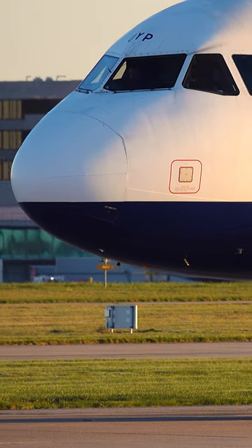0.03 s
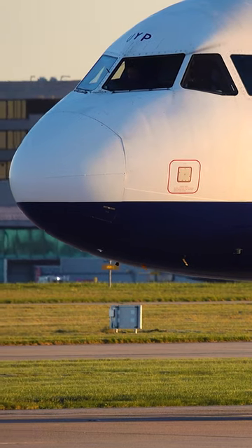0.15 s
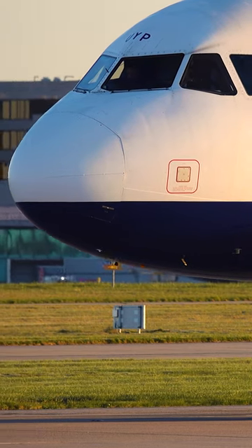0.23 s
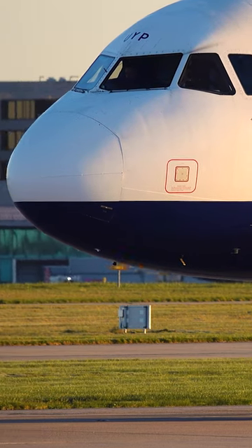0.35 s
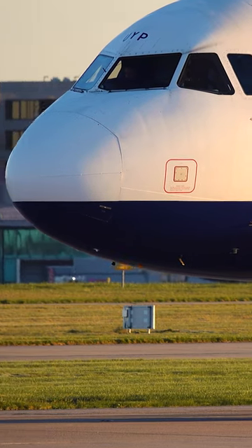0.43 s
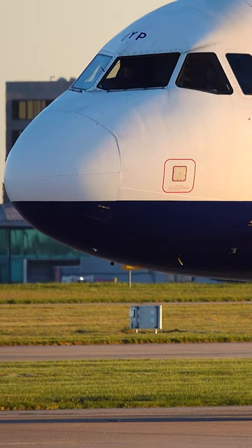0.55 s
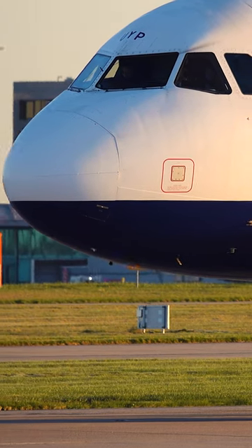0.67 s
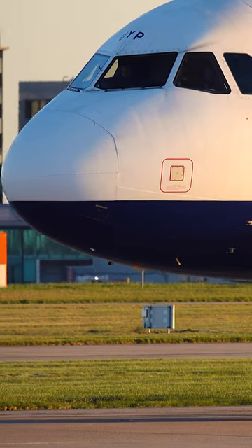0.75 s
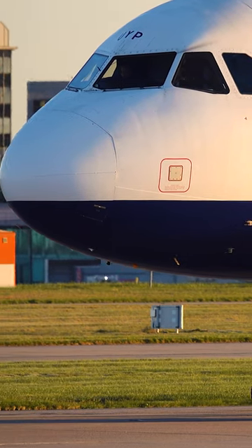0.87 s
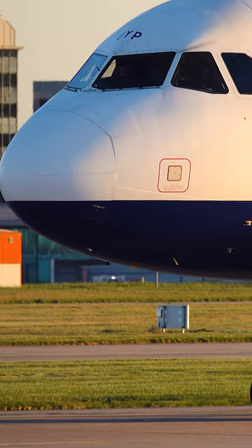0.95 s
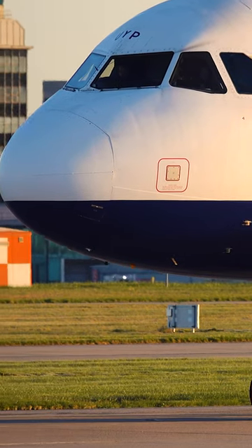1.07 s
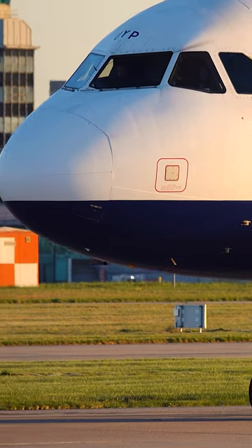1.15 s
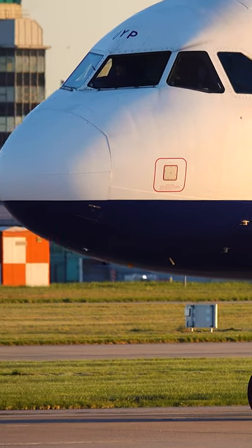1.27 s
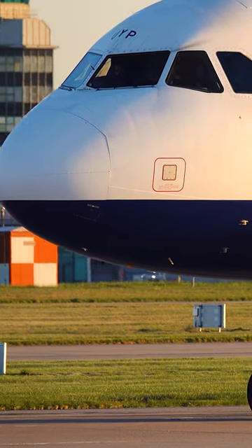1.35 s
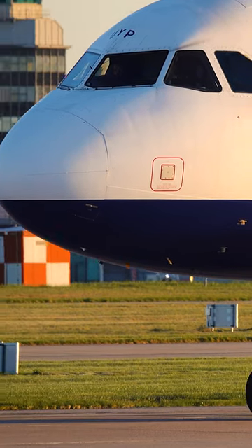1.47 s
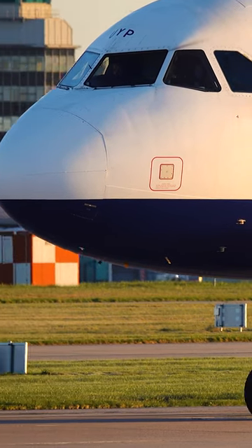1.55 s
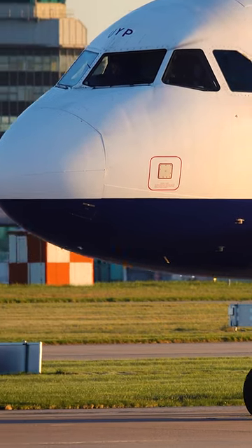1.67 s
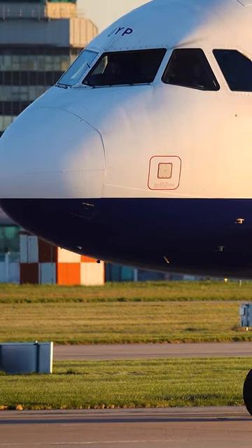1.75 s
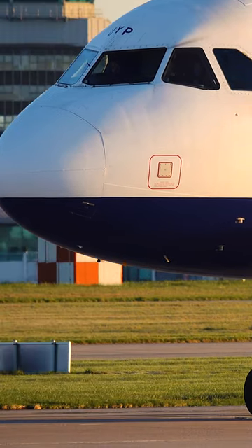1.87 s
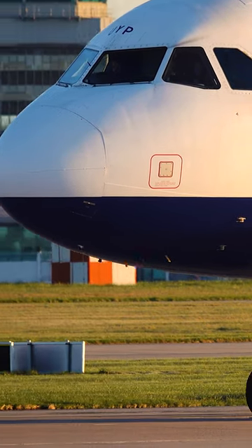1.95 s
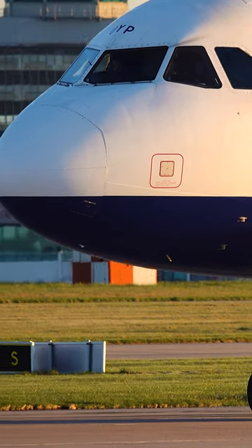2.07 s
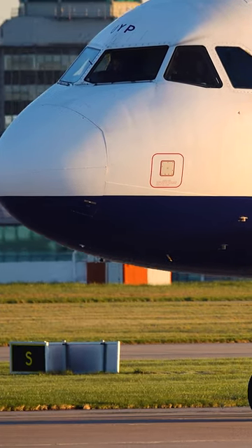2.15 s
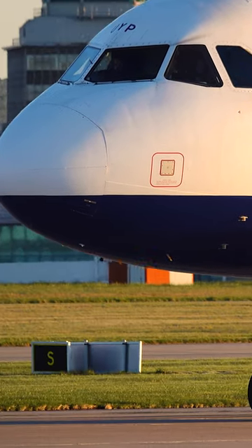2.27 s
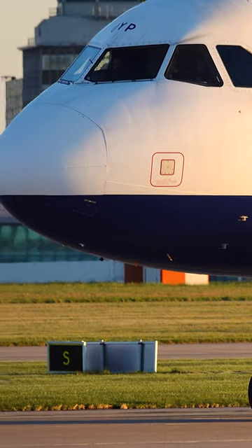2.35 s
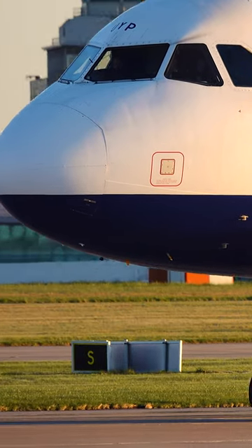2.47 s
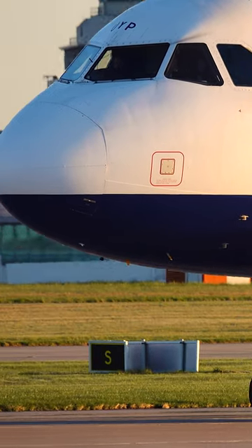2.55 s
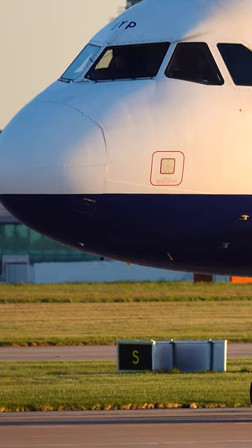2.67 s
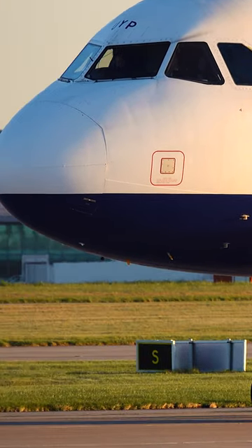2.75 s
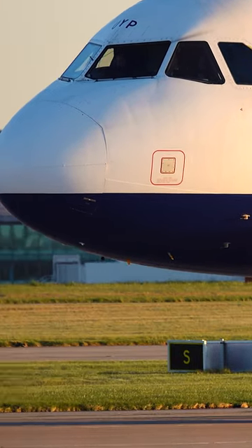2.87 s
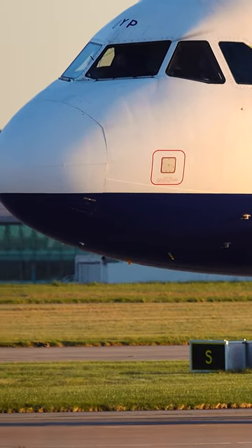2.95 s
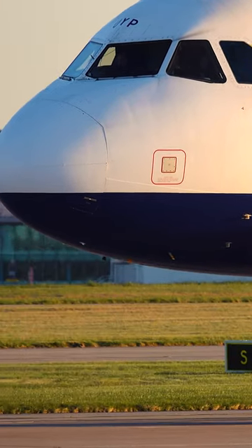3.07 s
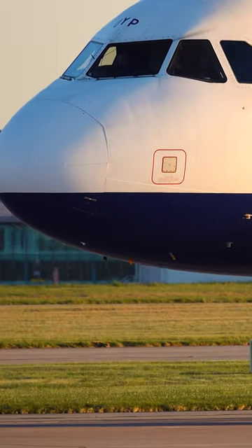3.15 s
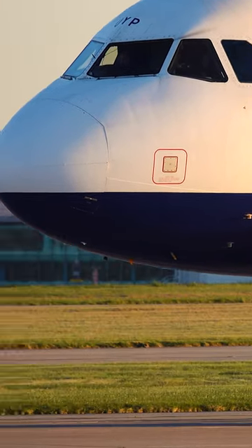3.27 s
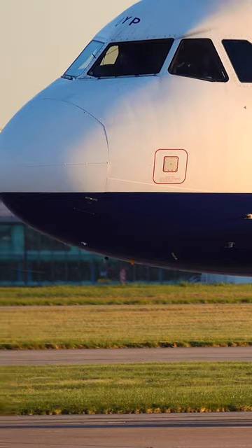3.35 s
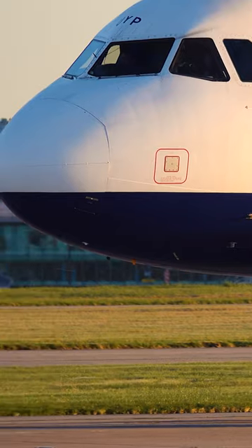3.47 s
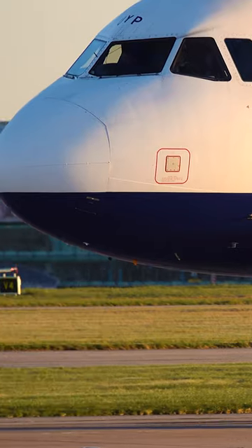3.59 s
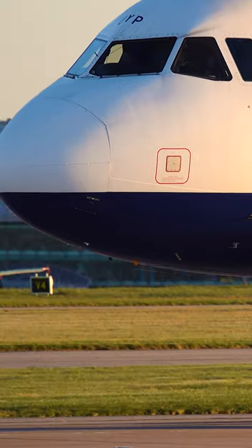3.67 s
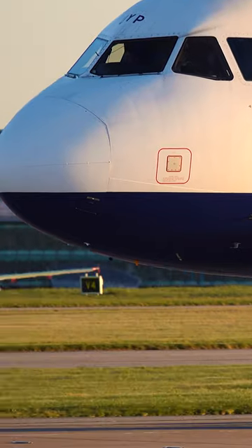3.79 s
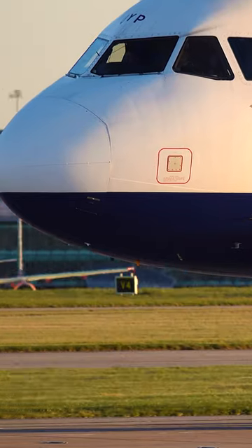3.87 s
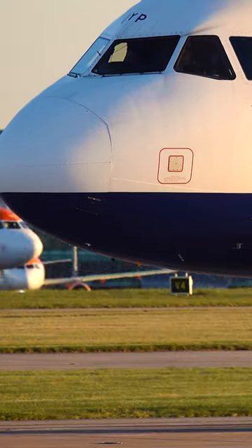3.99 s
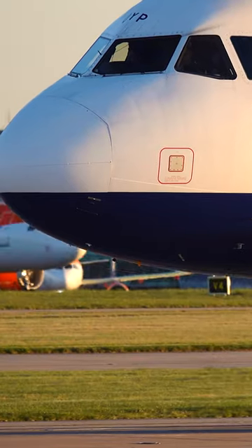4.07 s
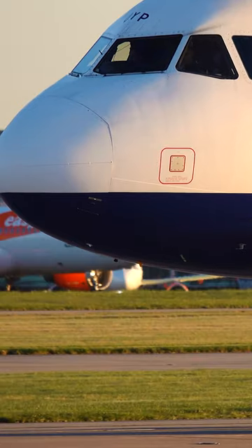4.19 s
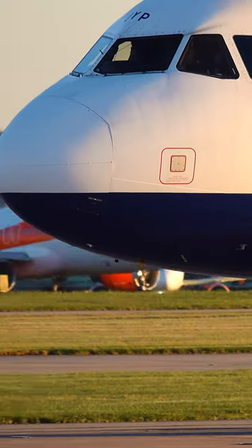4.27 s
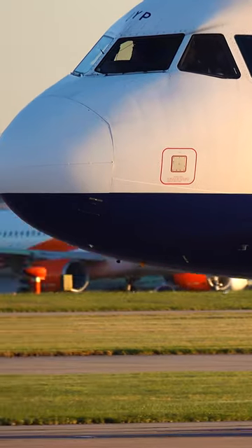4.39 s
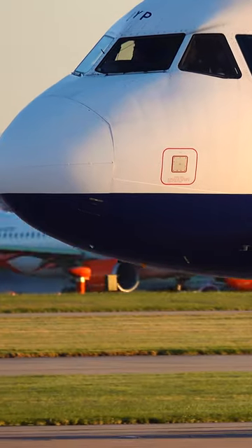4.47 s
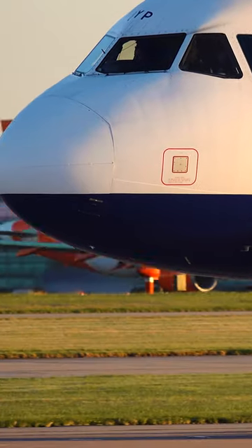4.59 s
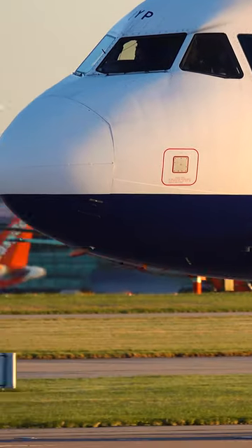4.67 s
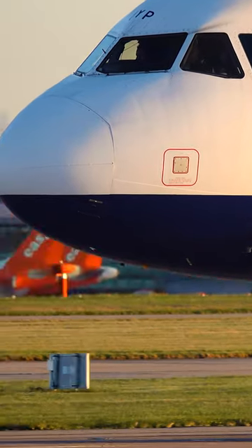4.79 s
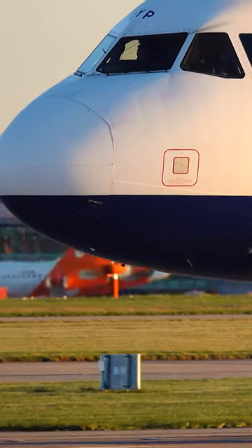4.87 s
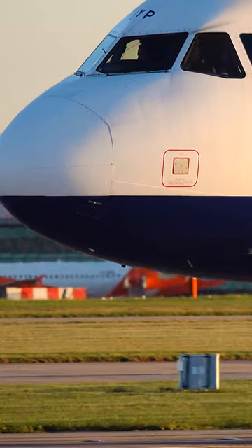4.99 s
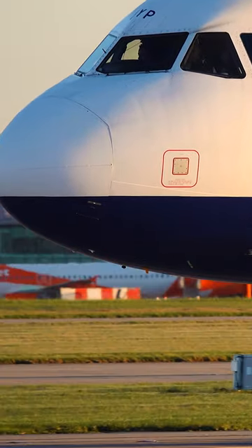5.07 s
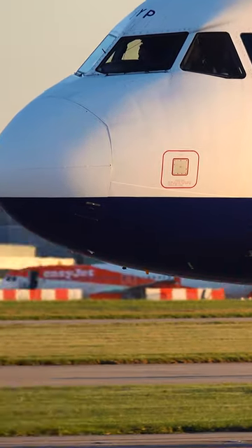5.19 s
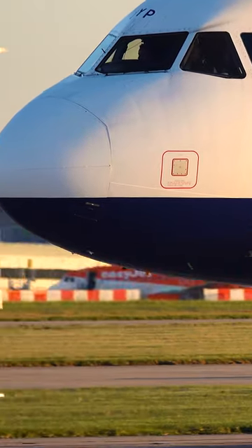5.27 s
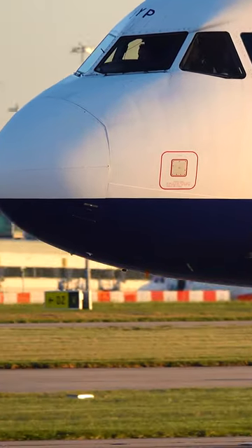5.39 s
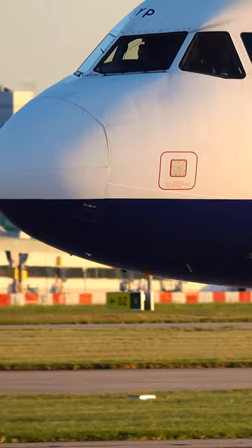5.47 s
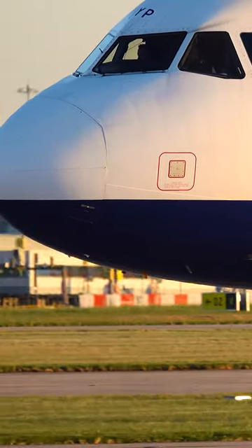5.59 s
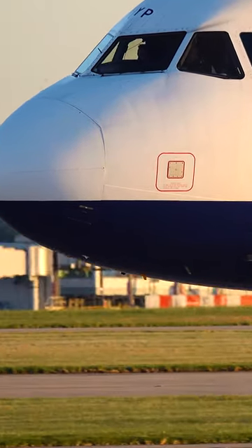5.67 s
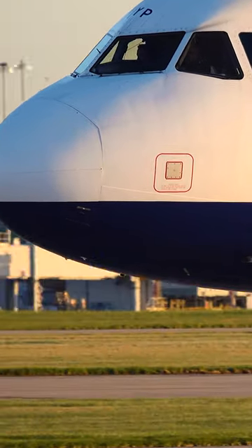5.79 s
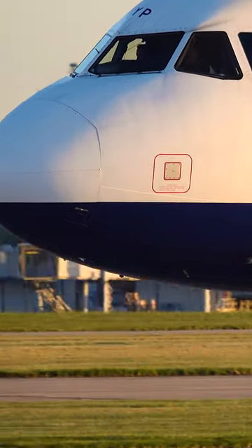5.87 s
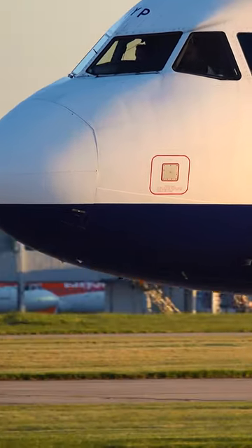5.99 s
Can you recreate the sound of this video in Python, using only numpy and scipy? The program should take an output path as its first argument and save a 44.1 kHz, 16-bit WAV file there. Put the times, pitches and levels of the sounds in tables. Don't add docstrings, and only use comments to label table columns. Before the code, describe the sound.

An airliner's two turbofans rise in pitch and strength near a runway, whistling and hissing, before a harsh sawing buzz joins the roar.

```python
import sys
import numpy as np
from scipy import signal
from scipy.fft import rfft, irfft, next_fast_len
from scipy.io import wavfile
from scipy.ndimage import uniform_filter1d

SR = 44100
rng = np.random.default_rng(int(sys.argv[2]) if len(sys.argv) > 2 else 0)


def gain_from_db(level_db):
    decades = np.asarray(level_db, float) / 20
    return 10 ** decades


def dump(signal):
    limited = np.clip(np.atleast_2d(signal).T, -1, 1)
    pcm = np.round(limited * 32767).astype(np.int16)
    wavfile.write(sys.argv[1], SR, pcm)


N = 266364
BLADES = 22


def rms_one(x):
    return x / np.sqrt(np.mean(x ** 2) + 1e-20)


def in_time(rows):
    s, *columns = np.transpose(rows)
    return [np.interp(np.arange(N) / SR, s, c) for c in columns]


def at_hz(points, hz):
    point_hz, point_db = np.transpose(points)
    return np.interp(np.log(hz), np.log(point_hz), point_db)


def bell(s, at, half):
    return np.exp(-.5 * ((s - at) / half) ** 2)


def drift(rate_hz, size=N):
    step, run_in = 16, 4000
    r = np.exp(-2 * np.pi * rate_hz * step / SR)
    noise = rng.standard_normal(size // step + run_in + 2)
    slow = signal.lfilter([1], [1, -2 * r, r * r], noise)[run_in:]
    return np.interp(np.arange(size) / step, np.arange(len(slow)), rms_one(slow - slow.mean()))


def coloured(points):
    size = next_fast_len(N)
    hz = np.arange(size // 2 + 1) * SR / size + 1
    spectrum = gain_from_db(at_hz(points, hz)) * rfft(rng.standard_normal(size))
    return rms_one(irfft(spectrum, size)[:N])


def tone(angle, level_db, fade_db, fade_hz, wobble):
    gain = np.sqrt(2) * gain_from_db(level_db + fade_db * drift(fade_hz, len(angle)))
    phase = 2 * np.pi * rng.random() + wobble * drift(fade_hz, len(angle))
    return gain * np.sin(angle + phase)


def supersonic(blade_hz):
    sonic_hz, spread_hz = 1529, 4.6
    return 1 / (1 + np.exp((sonic_hz - blade_hz) / spread_hz))


def thrust(blade_hz):
    start_hz, full_hz = 915, 1585
    return (blade_hz - start_hz) / (full_hz - start_hz)


# time in seconds, blades passing per second in Hz.
NEAR_FAN_SPEED = [(0.0, 914.6), (0.72, 933.5), (1.2, 974.5), (1.68, 1039), (2.16, 1146), (2.64, 1276),
                  (3.0, 1383.8), (3.24, 1471), (3.4, 1521), (3.56, 1552.5), (3.72, 1570.5), (3.9, 1580.5),
                  (4.32, 1583), (4.56, 1586.8), (4.8, 1596.5), (5.28, 1612.4), (5.55, 1625), (6.04, 1634)]
# time in seconds, lead over the near fan in Hz.
FAR_FAN_LEAD = [(0, 17), (1.2, 14), (1.68, 24), (2.0, 21), (2.64, 25), (3.0, 38), (3.6, 17), (4.5, 12),
                (4.95, 19), (5.5, 11)]


def fan_speeds():
    near_hz = in_time(NEAR_FAN_SPEED)[0]
    return near_hz, near_hz + in_time(FAR_FAN_LEAD)[0]


def shaft_angle(blade_hz):
    smooth_hz = uniform_filter1d(blade_hz, size=5001, mode="nearest")
    return 2 * np.pi * np.cumsum(smooth_hz) / SR / BLADES


# pitch in Hz, level change in dB.
HIGH_PITCH_LOSS = [(3600, 0), (4000, -13), (4800, -21)]


def blade_tones(blade_hz, laws, beams, lift_db):
    s, angle, out = np.arange(N) / SR, shaft_angle(blade_hz), 0
    coarse_s = s[::64]
    for k, ((start_db, rise_db, step_db), rows) in enumerate(zip(laws, beams)):
        level_db = start_db + rise_db * thrust(blade_hz) + step_db * supersonic(blade_hz)
        level_db = level_db + at_hz(HIGH_PITCH_LOSS, (k + 1) * blade_hz)
        beam_db = sum(db * bell(coarse_s, at, half) for at, db, half in rows)
        level_db = level_db + np.interp(s, coarse_s, beam_db) + lift_db
        out = out + tone((k + 1) * BLADES * angle, level_db, fade_db=1.4, fade_hz=14.0, wobble=.2 + .2 * k)
    return out


# level at thrust 0 in dB, rise to thrust 1 in dB, step when the tips turn supersonic in dB.
NEAR_TONES = [
    (-36, 7, 7),
    (-43.5, 16, -3.5),
    (-42.5, 7, -7.5),
]
# centre in seconds, lift in dB, half length in seconds.
NEAR_BEAMS = [(.18, -12, .07), (.38, 5, 0.033), (.76, 3, 0.081), (.97, 5, 0.018), (1.17, -10, 0.091),
              (1.39, 2.5, 0.092), (1.68, -10, 0.058), (1.83, 3, 0.092), (2.16, 5, .04), (2.28, -4, 0.028),
              (2.9, -2, 0.064), (3.34, 13, 0.055), (3.49, -9, 0.033), (3.63, 5, 0.091), (4.08, -3.5, 0.073),
              (4.2, 6.5, 0.09), (4.46, 6, 0.085), (4.69, -5, 0.077), (5.14, 3.5, 0.061), (5.6, 2.5, 0.085),
              (5.87, 2.5, 0.052), (6.04, -13, .06)]
NEAR_SECOND_BEAMS = [(.1, 2, .08), (.36, 0, .05), (.7, 1, .15), (1.27, 5, 0.091), (1.65, -12, 0.099),
                     (2.36, 5.5, 0.072), (2.6, -2, 0.078), (2.85, 1, .08), (3.19, 7.5, .08),
                     (3.33, -7, 0.024), (3.48, 6, .09), (4.0, -0.5, 0.087), (4.87, 9, .15),
                     (5.22, 6, 0.083), (5.52, 2.5, 0.046), (5.8, 6.5, 0.032), (6.04, -7, 0.081)]
NEAR_THIRD_BEAMS = [(.0, 10.5, 0.044), (.24, -6, .05), (.36, 3, .04), (.5, -3, .05), (1.4, 5.5, 0.088),
                    (1.68, 5, .05), (3.25, 8, .2)]


def near_fan_tones(near_hz):
    return blade_tones(near_hz, NEAR_TONES, [NEAR_BEAMS, NEAR_SECOND_BEAMS, NEAR_THIRD_BEAMS], lift_db=0.67)


# level at thrust 0 in dB, rise to thrust 1 in dB, step when the tips turn supersonic in dB.
FAR_TONES = [
    (-41, 6.3, -5),
    (-49, 4.6, -9.5),
]
# centre in seconds, lift in dB, half length in seconds.
FAR_BEAMS = [(.6, 7.1, 0.045), (1.5, 6.4, 0.23), (1.82, 3.4, 0.073), (2.4, 3.7, 0.053), (2.9, 12, 0.094),
             (3.36, 15, 0.057), (4.62, 13, 0.16), (4.92, 9.2, 0.1), (5.2, 9, 0.069)]
FAR_SECOND_BEAMS = [(.55, 6, .2), (1.45, -10, .12), (2.72, 14, 0.25), (4.85, 18.5, .25)]


def far_fan_tones(far_hz):
    return blade_tones(far_hz, FAR_TONES, [FAR_BEAMS, FAR_SECOND_BEAMS], lift_db=0.4)


# shaft order, level in dB.
BOOSTER = [(94, -62), (116, -57), (138, -62), (160, -68), (182, -71), (144, -62), (166, -70), (188, -78)]
# time in seconds, level in dB.
BOOSTER_FADE = [(0, 1.5), (.6, 1), (1.2, 0), (2.0, -5), (2.6, -25)]
# time in seconds, level in dB.
FAR_STAGE = [(1.3, -68), (1.55, -54), (2.15, -48), (3.05, -50), (3.3, -58), (4.4, -68), (4.8, -58),
             (5.4, -60), (6.04, -66)]


def booster(near_angle, far_angle):
    near, end = np.zeros(N), int(2.7 * SR)
    for order, db in BOOSTER:
        near[:end] += tone(order * near_angle[:end], db, fade_db=3.2, fade_hz=8.0, wobble=1.6)
    far = tone(89 * far_angle, in_time(FAR_STAGE)[0], fade_db=2.6, fade_hz=10.0, wobble=1.5)
    return gain_from_db(in_time(BOOSTER_FADE)[0]) * near + far


# time in seconds, pitch in Hz, level in dB.
CORE = [(0, 847, -40), (.23, 852, -39), (.86, 859, -40), (1.4, 872, -40), (1.91, 886, -39),
        (2.15, 893, -43), (2.4, 900, -70)]


def core():
    pitch_hz, level_db = in_time(CORE)
    return tone(2 * np.pi * np.cumsum(pitch_hz) / SR, level_db, fade_db=1.5, fade_hz=5.0, wobble=.3)


def noise_level(blade_hz, start_db, rise_db, lead_s, nearing_db, step_db):
    s = np.arange(N) / SR
    early_thrust = np.interp(s + lead_s, s, thrust(blade_hz))
    return start_db + rise_db * early_thrust + nearing_db * s + step_db * supersonic(blade_hz)


# frequency in Hz, density in dB per Hz.
BODY = [(400, -18.5), (600, -16), (800, 0), (1200, -2.5), (2000, -4), (2600, -4), (3100, 0), (3500, -4.5),
        (3720, -8.5), (3850, -26), (4500, -22.5), (6000, -64)]
# frequency in Hz, density in dB per Hz.
HISS = [(2500, -34), (3500, -9), (4000, 2.5), (5000, -2), (6500, -9), (8000, -16.5), (10000, -27),
        (13000, -38.5), (15500, -55), (17000, -56)]
# multiple of the blade rate, half width in Hz, dB over the body.
HEAPS = [(1, 35, -14), (2, 63, -15.5), (3, 170, -8), (4, 290, -8.5)]
# frequency in Hz, level change in dB.
HEAP_TILT = [(900, 0.5), (2000, 6.5), (3500, -5), (3900, -11.5), (4800, -26.5), (6500, -17.5)]


def fan_noise(angle, blade_hz):
    body_db = noise_level(blade_hz, start_db=-30, rise_db=7.5, lead_s=0.32, nearing_db=0.06, step_db=0.15)
    hiss_db = noise_level(blade_hz, start_db=-44.5, rise_db=3.5, lead_s=0.84, nearing_db=1.25, step_db=-0.5)
    gust, heaps = drift(4.3), 0
    for k, half_hz, db in HEAPS:
        turn = k * BLADES * angle
        narrow_noise = drift(half_hz) * np.cos(turn) + drift(half_hz) * np.sin(turn)
        heaps = heaps + gain_from_db(db + at_hz(HEAP_TILT, k * blade_hz)) * narrow_noise
    body = gain_from_db(body_db + .5 * gust) * (coloured(BODY) + heaps)
    hiss = gain_from_db(hiss_db + 0.26 * gust + 0.19 * drift(4.5)) * coloured(HISS)
    return body + hiss


# frequency in Hz, density in dB per Hz.
RUMBLE = [(15, -62.5), (25, -28), (33, -22), (45, -12.5), (70, -1), (110, 1), (145, 0.5), (190, -13),
          (260, -30), (400, -73)]
# frequency in Hz, density in dB per Hz.
ROAR = [(100, -29.5), (170, -17.5), (215, -3), (280, -1.5), (400, -1), (520, 5), (650, -4.5), (800, -8),
        (1200, -24.5), (2000, -67.5)]


def exhaust(blade_hz):
    rumble_db = noise_level(blade_hz, start_db=-37.5, rise_db=10.5, lead_s=0.6, nearing_db=0.49, step_db=-0.06)
    roar_db = noise_level(blade_hz, start_db=-38.5, rise_db=12, lead_s=0.12, nearing_db=0.25, step_db=0.4)
    rumble = gain_from_db(rumble_db + .4 * drift(2.5)) * coloured(RUMBLE)
    roar = gain_from_db(roar_db + 0.25 * drift(5.8)) * coloured(ROAR)
    return rumble + roar


# time in seconds, extra travel time in seconds.
GROUND_LAG = [(0, .0026), (6.04, .0029)]


def ground(x):
    share, cut_hz = 0.35, 2800
    dull = signal.sosfilt(signal.butter(1, cut_hz, fs=SR, output="sos"), x)
    heard_at = np.arange(N) - in_time(GROUND_LAG)[0] * SR
    return x + share * np.interp(heard_at, np.arange(N), dull)


# shaft order, steady level in dB.
BUZZ = [(10, -36.7), (11, -36.7), (12, -35.3), (13, -40.6), (18, -33.9), (19, -39.0), (21, -38.6),
        (25, -41.0), (26, -35.5), (27, -37.8), (29, -45.8), (30, -46.6), (31, -44.6), (32, -41.4),
        (33, -43.7), (34, -39.1), (35, -50.2), (38, -47.5), (39, -47.8), (40, -41.0), (45, -42.2),
        (47, -45.3), (48, -44.2), (54, -53.8), (56, -58.7), (58, -58.4), (67, -57.1), (85, -60.1),
        (87, -60.5), (89, -59.8)]
# centre in seconds, shaft order, peak in dB, half length in seconds.
LOBES = [(3.6, 18, -30.8, .11), (3.75, 25, -36.5, .2), (3.8, 11, -32.5, .25), (3.83, 19, -32.4, .21),
         (3.86, 48, -34.5, .14), (3.87, 26, -27.7, .33), (3.95, 34, -35.7, .16), (4.02, 45, -29.9, .1),
         (4.09, 27, -31.6, .42), (4.15, 12, -25.8, .14), (4.17, 10, -32.8, .2), (4.18, 40, -35.3, .26),
         (4.24, 18, -28.8, .14), (4.47, 12, -28.4, .11), (4.59, 26, -29.8, .13), (4.74, 27, -33, .16),
         (4.76, 25, -34.7, .28), (4.85, 45, -33.2, .11), (4.93, 11, -28.1, .21), (5.02, 48, -35.9, .22),
         (5.2, 34, -35.8, .6), (5.22, 10, -33.1, .6), (5.25, 21, -34.6, .5), (5.28, 18, -26.9, .23),
         (5.37, 12, -27.8, .25), (5.42, 26, -33, .3), (5.53, 32, -34.8, .45), (5.61, 35, -34, .37),
         (5.73, 23, -33.1, .24), (5.76, 10, -25.5, .24)]
# centre in seconds, shaft order, peak in dB, half
# length in seconds.
MORE_LOBES = [(5.82, 49, -39, .28), (5.82, 59, -46, .26), (5.85, 60, -45, .26), (5.8, 56, -48, .2),
              (5.1, 9, -35, .2), (5.6, 89, -54, .3), (4.2, 89, -55, .15), (3.7, 14, -34, .2),
              (5.0, 14, -33, .2), (5.5, 14, -35, .15), (5.62, 17, -31, .09), (5.26, 19, -33.7, .12),
              (5.54, 13, -32.5, .1), (3.65, 32, -36.4, .11), (4.66, 40, -35.5, .13), (5.56, 43, -35, .1),
              (5.61, 29, -38, .37), (5.75, 54, -44, .2), (5.9, 17, -33.6, .07), (5.92, 11, -28.7, .05),
              (4.45, 39, -36.6, .12), (5.81, 18, -30, .17), (5.77, 34, -32.3, .16), (5.81, 29, -34.7, .17),
              (5.85, 31, -35.7, .13), (5.83, 33, -38, .15), (5.85, 13, -32, .12), (4.24, 33, -37.5, .13),
              (5.81, 26, -32, .14), (4.27, 48, -37.7, .09)]


def buzz_saw(angle, blade_hz, steady_db, lobe_db):
    start, out = 3 * SR, np.zeros(N)
    fine, coarse = np.arange(start, N), np.arange(start, N, 256)
    broadside = gain_from_db(4 * bell(coarse / SR, 5.84, .15))
    steady = supersonic(blade_hz[coarse]) * broadside
    gain = {order: gain_from_db(db + steady_db) * steady for order, db in BUZZ}
    for at, order, db, half in [*LOBES, *MORE_LOBES]:
        lobe = gain_from_db(db + lobe_db) * bell(coarse / SR, at, half)
        gain[order] = np.maximum(gain.get(order, 0), lobe)
    for order in sorted(gain):
        wave = tone(order * angle[start:], 0, fade_db=2.2, fade_hz=10.0, wobble=.3)
        out[start:] += np.interp(fine, coarse, gain[order]) * wave
    return out


# frequency in Hz, density in dB per Hz.
HAZE = [(300, -80), (650, -8), (800, 0), (1000, 0), (1150, -4), (1400, -1), (1700, -18), (2600, -90)]


def shock_haze(blade_hz):
    level_db = -29 + 3 * drift(5.2)
    return supersonic(blade_hz) * gain_from_db(level_db) * coloured(HAZE)


def scene():
    near_hz, far_hz = fan_speeds()
    near, far = shaft_angle(near_hz), shaft_angle(far_hz)
    tones = near_fan_tones(near_hz) + far_fan_tones(far_hz) + booster(near, far) + core()
    noise = fan_noise(near, near_hz) + ground(exhaust(near_hz))
    shocks = buzz_saw(near, near_hz, steady_db=-1.2, lobe_db=.4) + shock_haze(near_hz)
    return (tones + noise + shocks)[None]


def band_limit(x):
    return signal.sosfilt(signal.butter(12, 15610, fs=SR, output="sos"), x)


def record(dry):
    heard = signal.sosfilt(signal.butter(2, 34, "high", fs=SR, output="sos"), dry)
    edge = np.minimum(np.arange(N), np.arange(N)[::-1]) / 8
    mix = heard * np.sin(np.pi / 2 * np.minimum(edge, 1)) ** 2
    return band_limit(mix)


dry = scene()
out = record(dry)
dump(out)
```